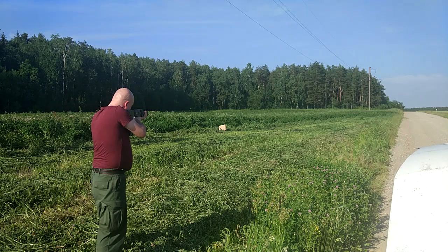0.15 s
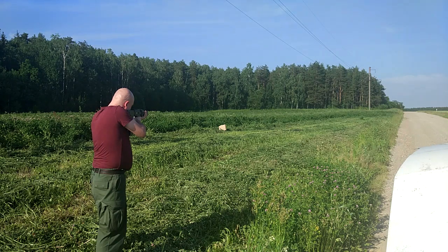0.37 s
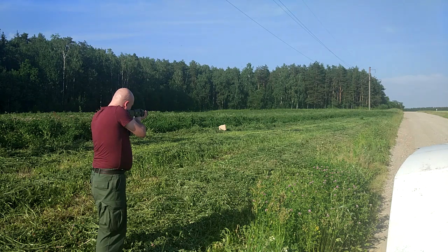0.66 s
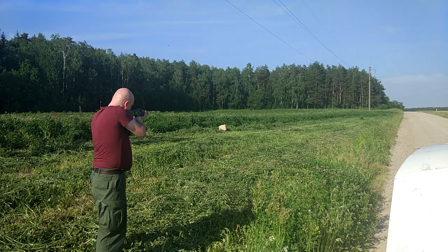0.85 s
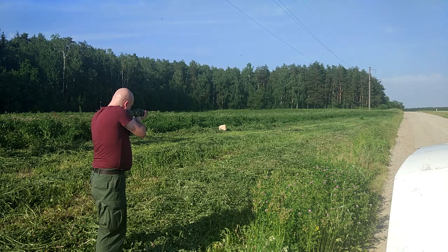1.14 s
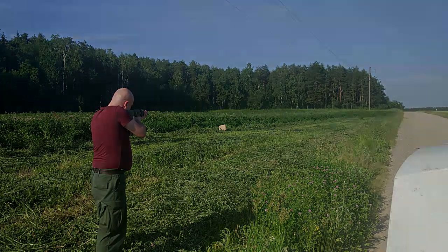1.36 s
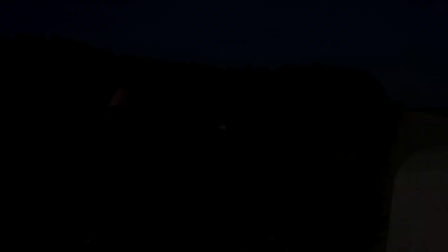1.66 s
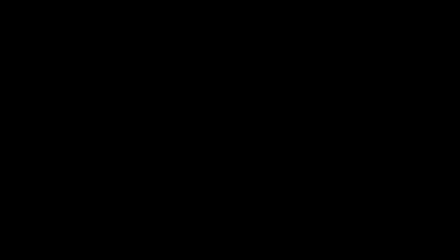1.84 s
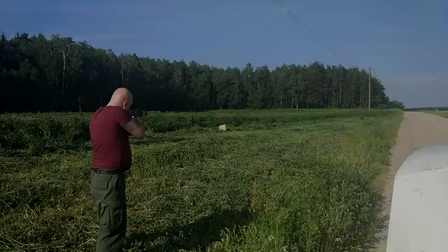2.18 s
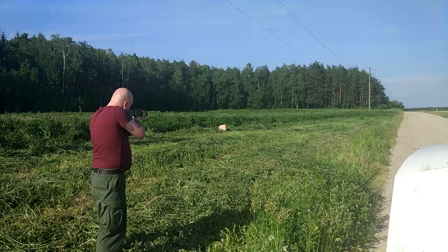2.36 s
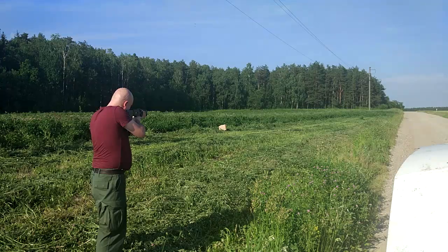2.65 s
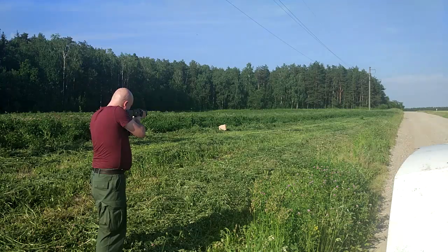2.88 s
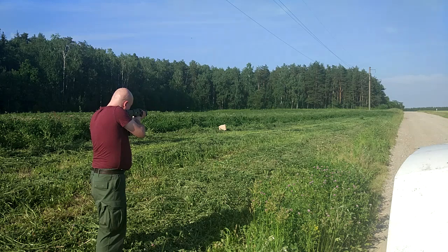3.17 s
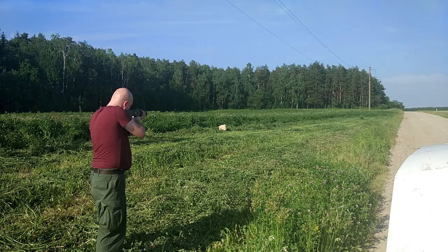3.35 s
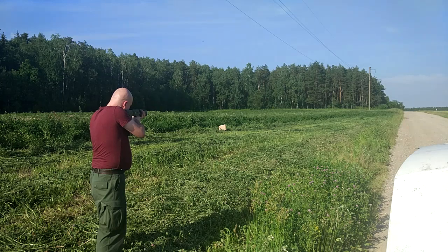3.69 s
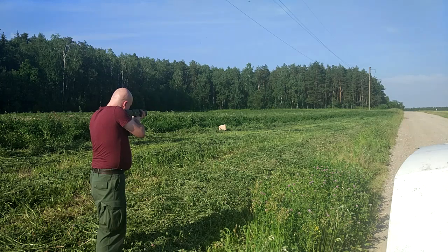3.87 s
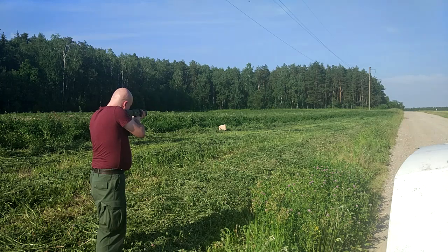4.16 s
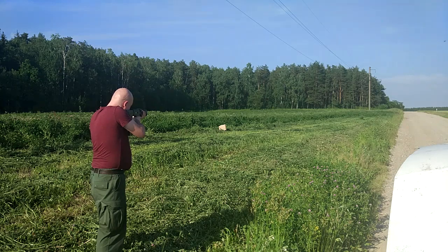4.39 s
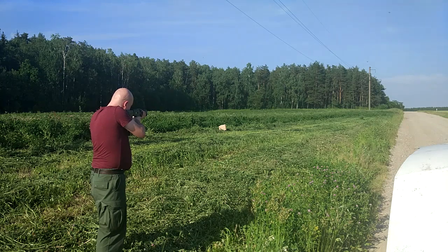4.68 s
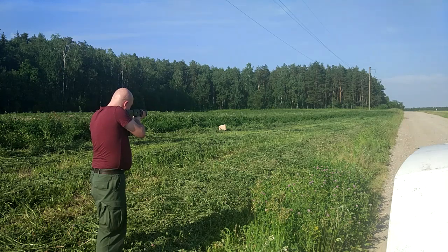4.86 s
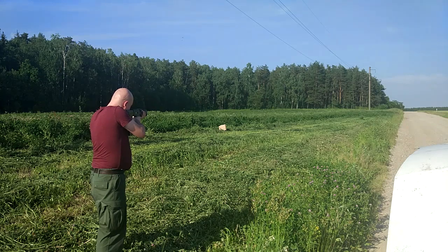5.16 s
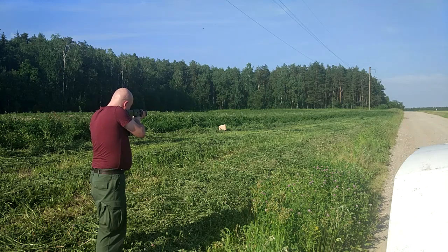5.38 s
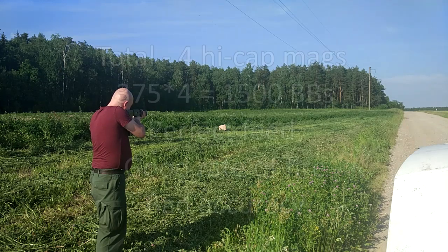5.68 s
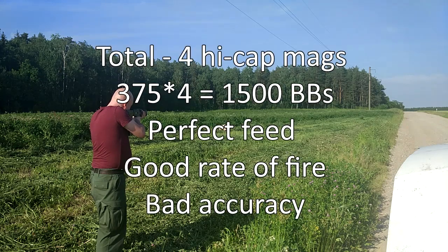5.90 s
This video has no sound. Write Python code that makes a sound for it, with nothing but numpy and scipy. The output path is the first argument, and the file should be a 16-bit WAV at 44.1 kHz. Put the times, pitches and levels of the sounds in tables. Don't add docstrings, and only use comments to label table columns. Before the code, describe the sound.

Outdoors in an open field, an electric airsoft gun fires full-auto a few metres from a stereo microphone, slightly to the right. Each shot is a sharp clack with a hollow plastic rattle, airy pop and tiny ticks over whining gears. The burst stops, the motor winds down and a latch clicks; faint birds and a wind puff fill the brief pause. Another click, and the firing resumes until the end.

```python
import sys
import numpy as np
from scipy import signal
from scipy.fft import rfft, irfft, next_fast_len
from scipy.io import wavfile
from scipy.ndimage import uniform_filter1d

SR = 44100
rng = np.random.default_rng(int(sys.argv[2]) if len(sys.argv) > 2 else 0)


def undo_db(level):
    steps = np.asarray(level, float) / 20
    return 10 ** steps


def transcribe(signal):
    frames = np.atleast_2d(signal).T
    limited = np.clip(frames, -1, 1)
    pcm = np.round(limited * 32767).astype(np.int16)
    wavfile.write(sys.argv[1], SR, pcm)


N = 265923

# frequency_hz, density_db (per Hz)
HUSH = [(24, -61), (50, -10), (118, -7), (231, 2.5), (337, -6.5), (491, -3), (942, -8.5), (3140, -5.5),
        (3700, -6.5), (5500, -14.5), (8550, -13), (16000, -10.5)]
# time_s, level_db
BREEZE = [
    (1.5, -79),
    (2.2, -70),
    (2.35, -60),
    (2.8, -54),
    (2.95, -48),
    (3.15, -49),
    (3.45, -51),
    (3.6, -53),
    (6.04, -71),
]
# peak_s, level_db
PUFFS_OF_WIND = [
    (1.912, -63),
    (1.985, -47.5),
    (2.07, -58),
    (2.11, -68),
    (2.15, -71),
    (2.204, -59),
    (2.25, -70),
]
# start_s, length_s, first_hz, last_hz, level_db
BIRDS = [
    (1.887, 0.019, 4700, 3840, -63),
    (1.905, .01, 4300, 3500, -62),
    (1.912, 0.012, 3520, 4300, -56),
    (1.927, .058, 4680, 3750, -61),
    (2.006, 0.046, 3850, 2710, -57),
    (2.136, 0.023, 3900, 5500, -65),
    (2.186, 0.0068, 5070, 3300, -52),
    (2.195, 0.0092, 4370, 2840, -54),
    (2.21, .012, 3900, 2630, -68),
    (2.254, 0.029, 4220, 4400, -50),
]
# start_s, level_db, low_ring_db
LATCH = [
    (1.509, -37, 6),
    (2.276, -38, -4),
]

# before_shot_ms, speed_share, low_whine_db, mesh_db
WINDING = [(0, 0.87, -26, 2.5), (6.922, .92, 0.5, -2.5), (12.24, .92, 6.5, 3), (25.09, .97, -5.5, 1),
           (39.65, 1.03, -5.5, 5.5), (68.5, 0.97, -10, 3)]
# after_trigger_off_s, speed_share, level_db
COAST = [(0, 0.97, -1.5), (.03, .8, -2.5), (.055, .5, -12.5), (.07, .6, -23), (.09, .6, -9.5),
         (.12, .6, -26.5), (.3, .6, -75)]
# after_trigger_on_s, speed_share, level_db
SPIN_UP = [(0, 0.429, -74), (.005, .45, 0), (.016, .55, -16), (.04, .85, -5.5), (.05, .92, 1.5),
           (.065, .97, -4), (.13, 0.97, -1.44)]
# pitch_hz, width_hz, level_db
LOW_WHINE = (1000, 150, -41.5)
# pitch_hz, width_hz, level_db
WHINES = [(1565, 143, -43.5), (2390, 96, -47.5), (3170, 87, -37.5), (3650, 84, -40.5)]
# frequency_hz, density_db (per Hz)
MESH = [(150, -11.5), (400, -12), (600, -8), (730, -10.5), (950, -4.5), (1600, -3.5), (2500, 1),
        (3100, 2.5), (3600, -4), (4300, -9), (5200, -14), (7500, -17.5), (11000, -24.5), (16000, -32)]

# start_s, shots, pair_ms, to_second_of_pair_ms
RUNS = [(.021, 6, 125.5, 54), (.3953, 12, 126.2, 54.6), (1.147, 1, 125, 62), (1.2195, 4, 128, 55.7),
        (2.338, 2, 137, 75.5), (2.475, 7, 115.7, 57.85), (2.8808, 5, 117, 58.5), (3.1745, 4, 119.8, 59.7),
        (3.414, 8, 120.4, 52.1), (3.8975, 8, 122.7, 53.3), (4.389, 12, 124.4, 54.2),
        (5.1369, 6, 125.4, 54.3), (5.513, 9, 126.4, 54.5)]
WIND_UP_MS = [55.5, 57.5, 68, 200]
CRACK_DB = [-12, -9, -9, -12]
CHARGE_DB = [-26, -29, -28.5, -26.5]
RELEASE_DB = [-60, -38, -41, -50]
SHELL_LOW_DB = [4, 8.8, 9, 9.4]

# start_s, level_db
TICKS_EARLY = [(0.0141, -26), (0.0347, -23), (0.044, -28), (0.0995, -28), (0.1412, -33), (0.1617, -26),
               (0.1707, -33), (0.215, -25), (0.2662, -34), (0.2877, -31), (0.339, -31), (0.3435, -32),
               (0.3595, -37), (0.3903, -32), (0.4105, -25), (0.4641, -33), (0.4756, -42), (0.5163, -30),
               (0.5368, -25), (0.5452, -32), (0.59, -25), (0.5995, -36), (0.642, -29), (0.6617, -33),
               (0.6705, -36), (0.716, -31), (0.7256, -27), (0.7679, -35), (0.7878, -30), (0.7971, -36),
               (0.8443, -30), (0.8947, -34), (0.9147, -24), (0.9236, -35), (0.93, -34), (0.97, -30),
               (0.9791, -39), (1.0412, -27), (1.051, -29), (1.0957, -19), (1.1067, -32), (1.1626, -30),
               (1.2143, -28), (1.2336, -22), (1.2432, -27), (1.2995, -38), (1.343, -37), (1.3623, -22.5),
               (1.3716, -33), (1.4177, -19), (1.4375, -25.5), (1.4469, -31), (2.4079, -34), (2.428, -24),
               (2.469, -32), (2.4892, -22), (2.4994, -32), (2.5283, -35)]
TICKS_MIDDLE = [(2.548, -33), (2.6053, -31), (2.6146, -29), (2.6722, -32), (2.7005, -40), (2.7204, -35),
                (2.7302, -33), (2.788, -30), (2.8159, -28), (2.8364, -25), (2.8742, -23), (2.8947, -21),
                (2.904, -25), (2.9529, -30), (2.962, -28), (2.9912, -30), (3.0116, -25), (3.0499, -35),
                (3.0705, -34), (3.0795, -38), (3.109, -36), (3.1296, -24), (3.1685, -40), (3.189, -38),
                (3.2487, -26), (3.2882, -31), (3.3085, -25), (3.3178, -35), (3.3485, -39), (3.369, -27),
                (3.3774, -33), (3.4085, -31), (3.4288, -22), (3.4382, -30), (3.5489, -30), (3.5587, -34),
                (3.6004, -29), (3.609, -34), (3.6488, -35), (3.6694, -23), (3.6783, -35), (3.721, -25),
                (3.7304, -31), (3.7696, -31), (3.7903, -24), (3.799, -31), (3.852, -26), (3.861, -29),
                (3.892, -29), (3.9122, -34), (3.9217, -31), (3.966, -31), (4.0347, -27), (4.137, -31),
                (4.1572, -36), (4.2605, -36), (4.2805, -32), (4.3335, -35)]
TICKS_LATE = [(4.3432, -35), (4.3838, -33), (4.4041, -26), (4.467, -31), (4.5079, -24), (4.5282, -30),
              (4.5376, -32), (4.5817, -29), (4.5913, -38), (4.6319, -32), (4.6521, -33), (4.6614, -33),
              (4.705, -31), (4.7146, -33), (4.7758, -26), (4.8297, -39), (4.8392, -38), (4.8484, -35),
              (4.88, -35), (4.9006, -24), (4.9539, -33), (4.9644, -33), (5.0058, -31), (5.0263, -26),
              (5.0796, -25), (5.0896, -22), (5.0988, -33), (5.1314, -24), (5.2053, -30), (5.215, -25),
              (5.256, -33), (5.277, -22.5), (5.2867, -35), (5.3328, -25), (5.341, -32), (5.4031, -28),
              (5.4561, -24), (5.4612, -31), (5.4659, -28), (5.5076, -36), (5.5278, -21), (5.5819, -27),
              (5.6534, -26), (5.6632, -38), (5.708, -31), (5.7176, -29), (5.7603, -28), (5.7803, -27),
              (5.7897, -29), (5.8351, -25), (5.8446, -24), (5.8869, -33), (5.907, -26), (5.9164, -33),
              (5.9619, -30), (5.9714, -37), (5.9807, -33), (6.013, -44)]
# pitch_hz, level_db, t60_s
TICK = [(7230, 2.5, 0.0044), (8154, -1, 0.0056), (5900, -22, 0.003), (10000, -19, 0.0046)]
# delay_ms, level_db
PISTON = [
    (0, 2),
    (0.898, -9),
    (2.597, -3.5),
]
# pitch_hz, level_db, t60_s
CRACK = [(3800, -5., .007), (4300, -11, .005), (5100, -15, .004), (3350, -8, .008)]
# delay_ms, level_db
SHELL_BLOWS = [
    (.4, 3),
    (1.5, -6.5),
    (2.4, 8.5),
    (3.6, 6.5),
    (6, 5),
    (15, -1),
]
# pitch_hz, level_db, t60_s
SHELL = [(612, -8.5, 0.042), (880, -5, 0.018), (1086, -4.5, 0.027), (1419, 2, 0.015), (1537, 2.5, 0.015),
         (2030, -3, 0.0055), (2102, -3, 0.038), (2460, -39, 0.0017)]
# delay_ms, level_db
THUMP_ECHO = (9.28, -20.5)
# delay_ms, level_db (over the thump)
POP = [
    (3.3, 4),
    (5.498, -4.5),
]
# pitch_hz, level_db (over the thump), t60_s
HISS = [(528, -32, 0.021), (1280, -18, 0.016), (2350, -11, 0.018), (5500, -9.5, 0.011), (8480, -10, 0.0061),
        (12850, -30, 0.02)]

# frequency_hz, share
ALIKE = [(300, .97), (1000, .75), (4000, .65), (8000, .45), (13000, .2)]
# frequency_hz, left_minus_right_db
LEFT_GAIN = [(200, 2), (380, 2), (700, 1.5), (1290, -2.5), (2380, -6), (4400, 2), (8120, -6.5), (12000, 1)]
# frequency_hz, lead_rad
LEFT_LEAD = [(0, -3.5), (250, -0.5), (860, -1.56), (1640, -2), (2410, -2.5), (5340, -4.5), (7150, -10.5),
             (9300, -3.5), (22050, -41)]

CYCLE_S = 0.062
TRIGGER_OFF_S, TRIGGER_ON_S = 1.43, 2.27
SHELL_DB = -32
THUMP_DB, THUMP_MS, THUMP_HZ, THUMP_T60_S = 10.5, 1.07, 326, 0.0098


def rms_one(x):
    return x / np.sqrt(np.mean(x ** 2) + 1e-20)


def in_time(rows, t=None):
    s, *columns = np.transpose(rows)
    when = np.arange(N) / SR if t is None else t
    return [np.interp(when, s, c) for c in columns]


def shaped(x, gain):
    size = next_fast_len(N + 4096)
    hz = np.arange(size // 2 + 1) * SR / size + 1e-3
    return irfft(rfft(x, size) * gain(hz), size)[..., :N]


def table_gain(rows):
    hz, db = np.transpose(rows)
    return lambda f: undo_db(np.interp(np.log(f), np.log(hz), db))


def coloured(x, spectrum):
    return rms_one(shaped(x, table_gain(spectrum)))


def band_pass(x, order, low_hz, high_hz):
    return signal.sosfilt(signal.butter(order, [low_hz, high_hz], "band", fs=SR, output="sos"), x)


def ring(clicks, hz, t60):
    r, w = undo_db(-60 / (t60 * SR)), 2 * np.pi * hz / SR
    return signal.lfilter([0, np.sin(w)], [1, -2 * r * np.cos(w), r * r], clicks + 1e-18)


def fading(clicks, t60):
    return signal.lfilter([1], [1, -undo_db(-60 / (t60 * SR))], clicks + 1e-18)


def port_noise():
    hz, share = np.transpose(ALIKE)

    def alike(f):
        return np.interp(np.log(f), np.log(hz), share).clip(0, 1)

    shared, own = rng.standard_normal(N), rng.standard_normal((2, N))
    return shaped(shared, lambda f: np.sqrt(alike(f))) + shaped(own, lambda f: np.sqrt(1 - alike(f)))


def hush():
    return undo_db(-62.5 + 3.5) * coloured(rng.standard_normal((2, N)), HUSH)


def wind():
    shared, own = rng.standard_normal(N), rng.standard_normal((2, N))
    eddies = rms_one(band_pass(0.47 * shared + own, 3, 140, 250))
    t = np.arange(N) / SR
    rise_s, fall_s = 0.0078, 0.029
    puffs = sum(undo_db(db) * np.exp(-np.maximum((s - t) / rise_s, (t - s) / fall_s)) for s, db in PUFFS_OF_WIND)
    return (undo_db(in_time(BREEZE)[0]) + puffs) * undo_db(-3.5) * eddies * undo_db([[1], [-1]])


def birds():
    out = np.zeros(N)
    for s, length, first_hz, last_hz, db in BIRDS:
        along = np.linspace(0, 1, round(length * SR))
        swell_db = np.interp(along, [0, 0.76, 1], [-15, 0, -15])
        husk = 1 + 0.5 * rms_one(uniform_filter1d(rng.standard_normal(4000), size=60))[:len(along)]
        pitch_hz = first_hz + (last_hz - first_hz) * along ** 1.8
        tone = np.sin(2 * np.pi * np.cumsum(pitch_hz) / SR)
        level = np.sqrt(2) * undo_db(db + swell_db) * signal.windows.tukey(len(along), 0.2)
        out[round(s * SR):][:len(along)] += level * husk * tone
    return out * undo_db([[-1.5], [1.5]])


def latch():
    out = np.zeros(N)
    for s, db, low_db in LATCH:
        click = np.zeros(N)
        click[round(s * SR)] = undo_db(db)
        for k, (hz, mode_db, t60) in enumerate(SHELL[1:] + CRACK + TICK):
            out += (-1) ** k * undo_db(mode_db) * ring(click, hz, t60)
        out += undo_db(low_db) * ring(np.roll(click, 90), 550, 0.026)
    return out


def shot_times():
    return np.array([s + (k // 2 * pair_ms + k % 2 * second_ms) / 1000
                     for s, count, pair_ms, second_ms in RUNS for k in range(count)])


def whine(speed, hz, width_hz):
    r = np.exp(-np.pi * width_hz / SR)
    noise = rng.standard_normal(N) + 1j * rng.standard_normal(N)
    wobble = signal.lfilter([1], [1, -2 * r, r * r], noise)
    return rms_one(np.real(wobble * np.exp(2j * np.pi * np.cumsum(hz * speed) / SR)))


def gearbox():
    t, at = np.arange(N) / SR, shot_times()
    ahead = np.append(at, at[-1] + CYCLE_S)
    to_next_ms = 1000 * (ahead[np.searchsorted(ahead, t).clip(0, len(at))] - t)
    load_speed, low_db, mesh_db = in_time(WINDING, to_next_ms)
    pace = np.interp(t, at[1:-1], np.clip(2 * CYCLE_S / (at[2:] - at[:-2]), 0.95, 1.1))
    coasting, spinning_up = in_time(COAST, t - TRIGGER_OFF_S), in_time(SPIN_UP, t - TRIGGER_ON_S)
    run, run_db = np.where(t < TRIGGER_ON_S, coasting, spinning_up)
    speed = run * load_speed * (1 + 0.5 * (pace - 1))
    contacts = rng.random(N) < 4000 / SR
    teeth = contacts * undo_db(3.0 * rng.exponential(1, N).clip(0, 4)) * rng.choice([-1, 1], N)
    mesh = undo_db(-32) * coloured(rms_one(teeth) + 1.03 * port_noise(), MESH)
    orders = sum(undo_db(db) * whine(speed, hz, width) for hz, width, db in WHINES)
    mesh = mesh + run ** 2.4 * orders
    low_hz, low_width_hz, low_level_db = LOW_WHINE
    low = undo_db(low_level_db + low_db) * whine(speed, low_hz, low_width_hz)
    return undo_db(run_db) * (undo_db(mesh_db) * mesh + low)


def strengths():
    at = shot_times()
    since_ms = 1000 * np.diff(at, prepend=at[0] - 0.07)
    chance = rng.standard_normal((len(at), 4)).clip(-2, 2)
    weak_db = -5.3 * (np.abs(at - 1.147) < 0.01)
    tables = CRACK_DB, CHARGE_DB, RELEASE_DB, SHELL_LOW_DB
    spreads_db = 2, 1.03, 1, 0
    return [np.interp(since_ms, WIND_UP_MS, db) + spread * luck + weak_db
            for db, spread, luck in zip(tables, spreads_db, chance.T)]


def blows(level_db, contacts, spread_db, jitter_ms=0.35):
    out, at = np.zeros(N), shot_times()
    chance = rng.standard_normal((len(at), len(contacts)))
    late_ms = jitter_ms * rng.standard_normal(chance.shape)
    for k, (ms, db) in enumerate(contacts):
        where = np.round((at + (ms + late_ms[:, k]) / 1000) * SR).astype(int)
        inside = where < N
        np.add.at(out, where[inside], undo_db(level_db + db + spread_db * chance[:, k])[inside])
    return out


def struck(level_db, contacts, modes, spread_db):
    return sum((-1) ** k * undo_db(db) * ring(blows(level_db, contacts, spread_db), hz, t60)
               for k, (hz, db, t60) in enumerate(modes))


def buffet():
    t60 = 0.05
    swell = fading(fading(blows(0 * shot_times(), [(-7, 0)], 4.7), t60), t60)
    noise = rng.standard_normal((2, N)) + 0.89 * rng.standard_normal(N)
    low = signal.sosfilt(signal.butter(2, 84, fs=SR, output="sos"), noise)
    return undo_db(-63.5) * rms_one(swell * low)


def ticks():
    s, db = np.transpose(TICKS_EARLY + TICKS_MIDDLE + TICKS_LATE)
    share, out = rng.standard_normal((len(s), len(TICK))), 0
    for k, (hz, mode_db, t60) in enumerate(TICK):
        clicks = np.zeros(N)
        clicks[(s * SR).astype(int).clip(0, N - 1)] = undo_db(db + 5 + mode_db + 2.4 * share[:, k])
        out = out + ring(clicks, hz, t60)
    return band_pass(out, 2, 5500, 10500)


def shell(thump_db, low_db):
    low_hz, low_mode_db, low_t60 = SHELL[0]
    rattle = struck(SHELL_DB + 0.5 * (thump_db + 23.0), SHELL_BLOWS, SHELL[1:], 3.35)
    low_blows = blows(SHELL_DB + low_db + low_mode_db, [(1.5, 2), (11.4, -10.5)], 2.0, 0)
    return rattle + ring(low_blows, low_hz, low_t60)


def thump(thump_db, release_db):
    push = blows(thump_db + THUMP_DB, [(THUMP_MS, 0), THUMP_ECHO], 0, 0)
    push += blows(release_db + THUMP_DB, [(THUMP_MS - 11.1, 0)], 0, 0)
    swelling = ring(ring(push, THUMP_HZ, THUMP_T60_S), THUMP_HZ, THUMP_T60_S)
    return -swelling * 20 / (THUMP_T60_S * SR)


def muzzle_air(thump_db, release_db):
    out = np.zeros((2, N))
    air, r = port_noise(), np.exp(-1000 / (0.34 * SR))
    luck = rng.standard_normal(len(thump_db)).clip(-2, 2)
    ragged = undo_db(3 * rms_one(uniform_filter1d(rng.standard_normal((len(HISS), N)), size=250)))
    for flutter, (hz, db, t60) in zip(ragged, HISS):
        bright_db = 2.5 * luck * (hz > 4000)
        gust = blows(thump_db + 11 + db + bright_db, [(0.3, -0.1), (3.0, -4)], 0.97)
        afterhiss = undo_db(-10) * flutter * fading(gust, 0.17)
        flow = signal.lfilter([1 - r], [1, -r], fading(gust, t60) + afterhiss)
        flow += fading(blows(release_db + 20 + db, [(-6.0, 0)], 2.9), 0.041)
        flow += undo_db(-6) * fading(gust[::-1], 0.0047)[::-1]
        out += flow * rms_one(band_pass(air, 2, hz * 0.675, hz * 1.158))
    return out


def shots():
    crack_db, thump_db, release_db, low_db = strengths()
    body = struck(crack_db, PISTON, CRACK, 2.3)
    body += shell(thump_db, low_db)
    body += struck(thump_db - 1.5, POP, CRACK + TICK, 4.1)
    body += thump(thump_db, release_db)
    body += ticks()
    return body + muzzle_air(thump_db, release_db)


def at_ports(x):
    lead_hz, lead = np.transpose(LEFT_LEAD)
    gain = table_gain(LEFT_GAIN)
    left = shaped(x[0], lambda f: gain(f) * np.exp(1j * np.interp(f, lead_hz, lead)))
    right = signal.sosfilt(signal.cheby1(4, 1, 10840, fs=SR, output="sos"), x[1])
    t = np.arange(4000) / SR
    tails = rng.standard_normal((2, len(t))) * undo_db(-60 * t / 0.04)
    tails *= undo_db(-13) / np.linalg.norm(tails[0])
    direct = np.stack([left, right])
    direct = direct + signal.fftconvolve(direct, tails, axes=1)[:, :N]
    return signal.sosfilt(signal.butter(5, 221, "high", fs=SR, output="sos"), direct) + undo_db(-25) * direct


def scene():
    gun = at_ports(shots() + gearbox() + latch())
    return gun + birds() + wind() + hush() + buffet()


def roll_off(x):
    return signal.sosfilt(signal.butter(12, 16450, fs=SR, output="sos"), x)


def record(dry):
    from_change_ms = (np.arange(N) / SR - 1.852) * 1000
    dip = 1 - 0.72 * np.exp(-(from_change_ms / 4.8) ** 2)
    mix = signal.sosfilt(signal.cheby2(10, 60, 16600, fs=SR, output="sos"), dry * dip)
    return roll_off(mix)


dry = scene()
out = record(dry)
transcribe(out)
```